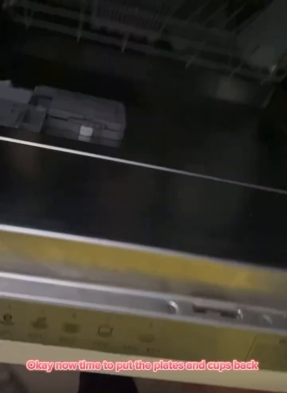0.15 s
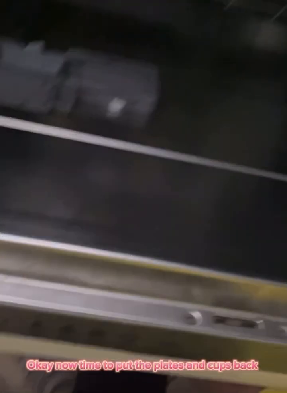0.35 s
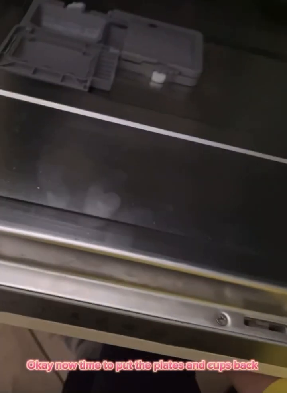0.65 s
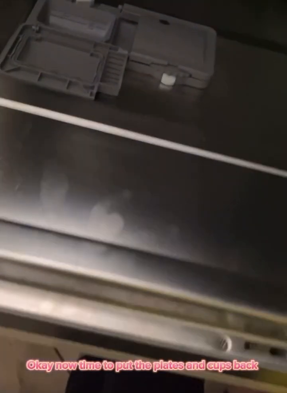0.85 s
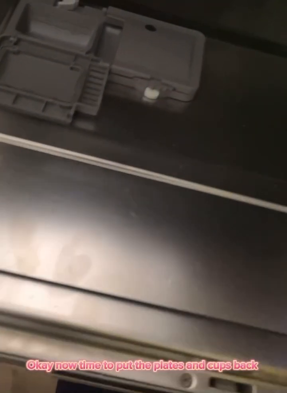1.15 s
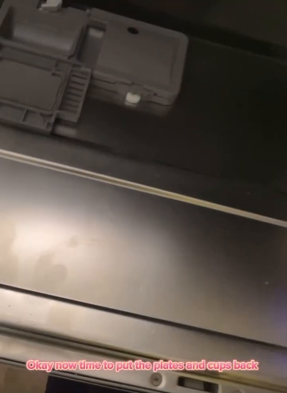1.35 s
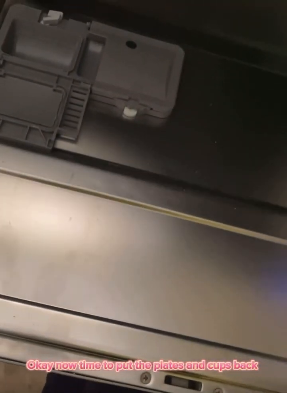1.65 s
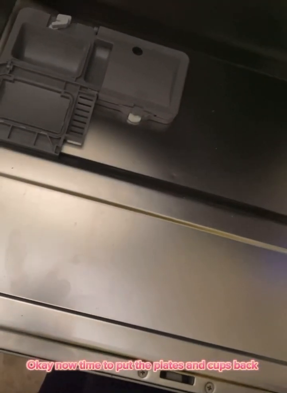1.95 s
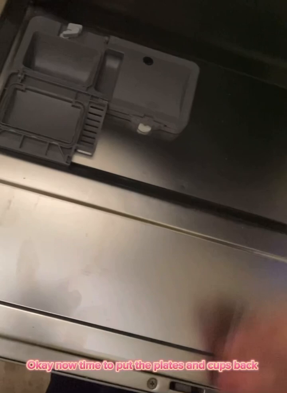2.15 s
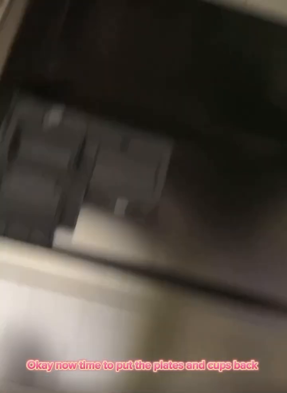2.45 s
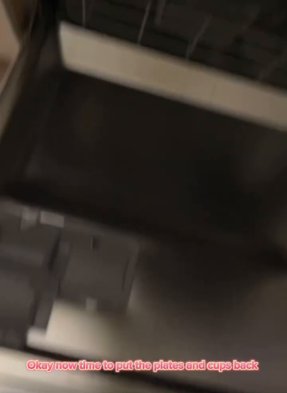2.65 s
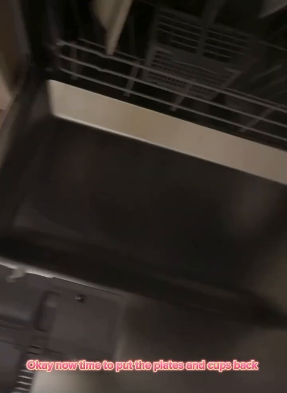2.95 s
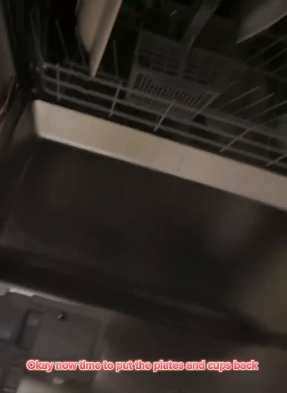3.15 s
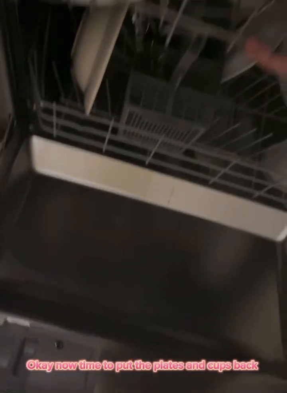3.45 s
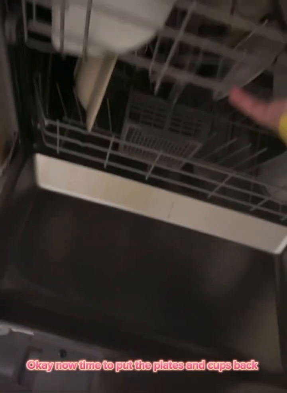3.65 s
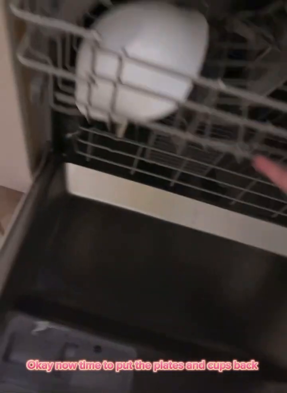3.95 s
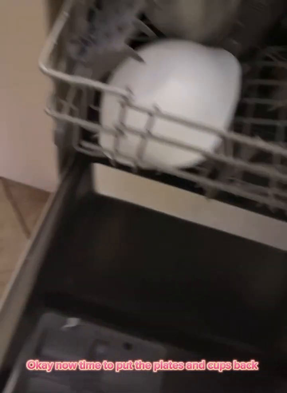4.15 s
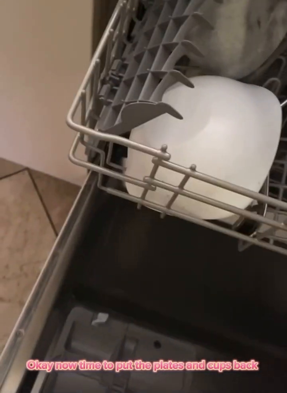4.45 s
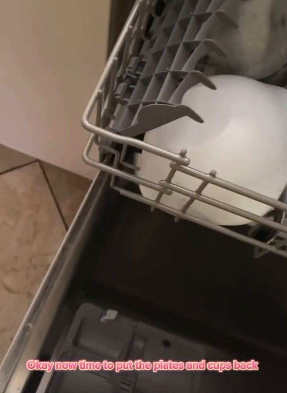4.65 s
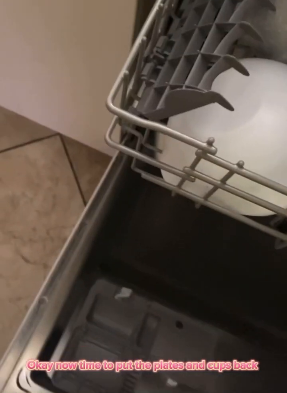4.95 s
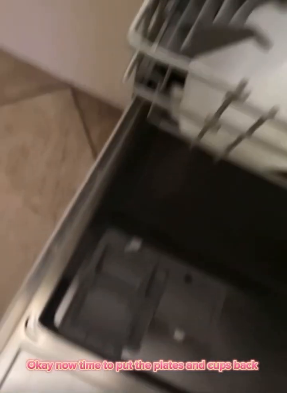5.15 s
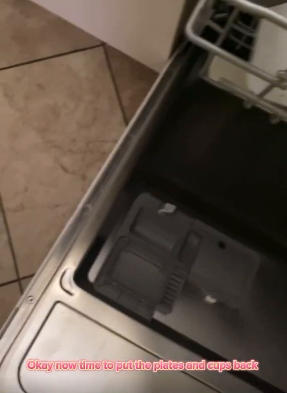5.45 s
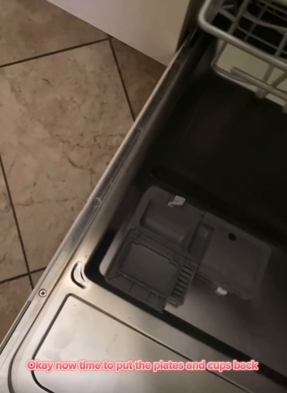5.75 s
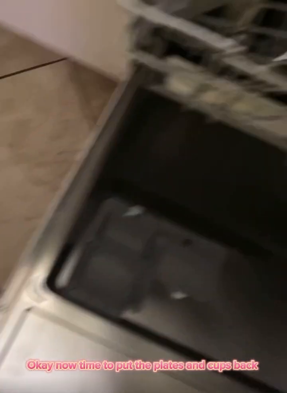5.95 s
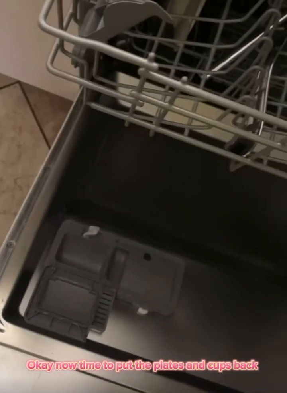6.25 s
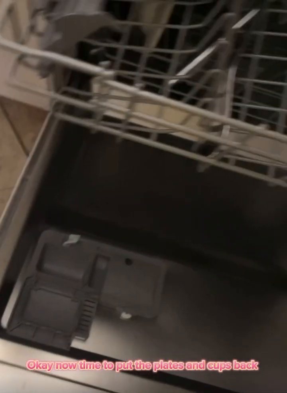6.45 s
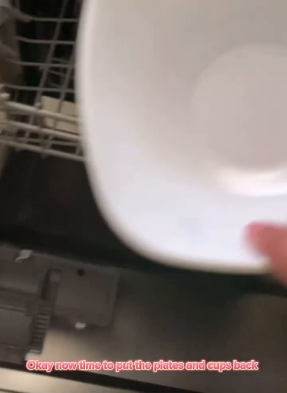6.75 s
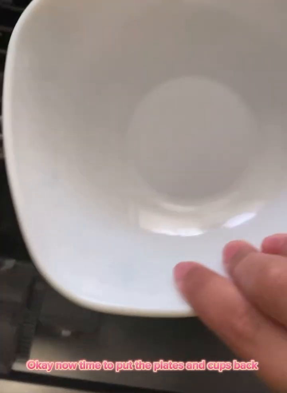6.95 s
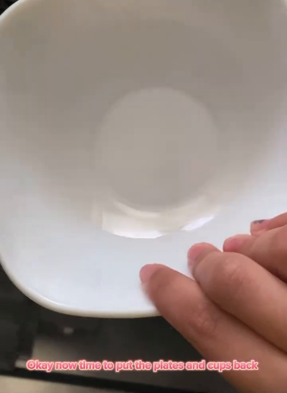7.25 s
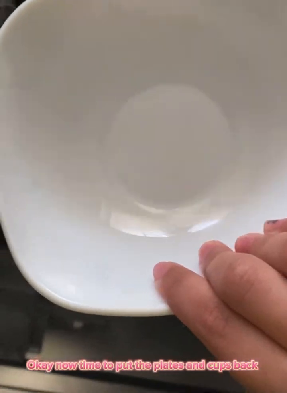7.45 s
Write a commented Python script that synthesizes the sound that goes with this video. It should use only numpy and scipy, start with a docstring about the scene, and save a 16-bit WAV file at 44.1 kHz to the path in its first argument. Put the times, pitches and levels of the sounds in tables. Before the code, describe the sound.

A quiet home kitchen with very faint room tone and hum, heard close up in stereo. Dull, roomy hammer-like thuds come from elsewhere in the house at about 0.3, 0.65, 1.0 and 1.4 s, with tiny nearby ticks and soft arm rustles around 0.9 and 2.4 s. Light taps come at 2.2 and 2.9 s. From 3.0 to 4.5 s a loaded dishwasher rack rolls out: low tub rumble, jiggling dishes, a light axle hiss and irregular knocks, strongest around 4.1 to 4.5 s. Small knocks follow near 4.7 s. From 5.15 to 5.9 s the rack is shaken as a bowl comes free, with knocks, small clinks, a quick rising metallic scrape at 5.5 s and bright ringing wire snaps at 5.7 to 5.8 s. Two more muffled thuds land at 6.1 and 6.4 s, their echoes fading; a barely audible brush at 6.9 s, then quiet.

```python
"""Unloading a dishwasher

Close by, the loaded upper rack rolls out on its rails: filtered noise rumbles, jiggles and hisses, bursts knock.
A bowl is lifted out: moving resonances scrape along the wires, which snap back and ring as decaying sines.
An arm rustles softly; dull blows, like hammering, come from elsewhere in the house over a quiet kitchen."""
import sys
import numpy as np
from scipy import signal
from scipy.fft import rfft, irfft
from scipy.io import wavfile
from scipy.ndimage import uniform_filter1d

SR = 44100
rng = np.random.default_rng(int(sys.argv[2]) if len(sys.argv) > 2 else 0)


def pcm_store(signal):
    """Save signal as 16-bit PCM."""
    levels = np.round(np.clip(np.atleast_2d(signal), -1, 1) * 32767)
    wavfile.write(sys.argv[1], SR, levels.astype(np.int16).T)


N = 335160
TIME = np.arange(N) / SR

# relative colour of the rumbling tub: [f/Hz, density/dB]
RUMBLE = [(20, -25.5), (45, -18), (70, -4), (92, 2.5), (125, -1.5), (170, -14), (260, -16.5), (600, -68.5)]
# relative colour of hissing axles, ticks and rubbed wire: [f/Hz, density/dB]
HISS = [(900, -22.5), (2400, 1.5), (3700, 2), (4900, -2.5), (5900, 3.5), (7300, -4), (8000, -3),
        (10000, -3), (11600, -1), (13500, -12)]
# phase by which the left microphone port leads the right: [f/Hz, phase/rad]
PORT_LEAD = [(100, 0), (620, -.55), (1300, 0), (2500, .6), (4200, 1.1), (5500, .4), (8600, 1.85),
             (12000, 3.0)]


def amp(db):
    """Decibels to a linear gain."""
    return 10 ** (np.asarray(db) / 20)


def evened(x):
    """Scales a signal to an RMS of one."""
    return x / np.sqrt(np.mean(x ** 2) + 1e-20)


def read(points, hz):
    """Reads a table along a logarithmic frequency axis."""
    f, value = np.transpose(points)
    return np.interp(np.log(hz + 1), np.log(f + 1), value)


def add(mix, s, sound):
    """Lays a sound into the mix at s seconds, cut at the end."""
    part = mix[:, round(s * SR):][:, :sound.shape[1]]
    part += sound[:, :part.shape[1]]


def drift(size, count):
    """Smooth chance that changes about once in count samples."""
    once = uniform_filter1d(rng.standard_normal(size), count)
    return evened(uniform_filter1d(once, count))


def noise(colour, size, grit=1):
    """Coloured noise at two microphone ports, more or less alike by frequency."""
    # left-right likeness: [f/Hz, likeness 0-1]
    likeness = [(150, 1), (300, 0.97), (520, 0.6), (1000, 0.5), (3000, 0.2), (6500, 0.2), (11000, 0.9)]
    hz = np.fft.rfftfreq(size, 1 / SR)
    left, other = rfft(rng.standard_normal((2, size)) * grit)
    same = np.clip(read(likeness, hz), 0, 1)
    right = same * left + np.sqrt(1 - same ** 2) * other
    right = right * np.exp(-1j * read(PORT_LEAD, hz))
    return evened(irfft(np.array([left, right]) * amp(read(colour, hz)), size))


def burst(colour, bands, size, window_s, swell, grit=1):
    """A blow on a body with dense modes: each band swells (by this power of time), dies fast, then lingers."""
    t, hz = np.arange(size) / SR, np.fft.rfftfreq(size, 1 / SR)
    spectrum, out = rfft(noise(colour, size, grit)), 0
    centres = np.array(bands)[:, 0]
    for own, (_, rise, t60, room_db, room_t60) in zip(np.eye(len(bands)), bands):
        share = read(np.c_[centres, own], hz)
        age = np.maximum(t - rise, 0)
        body, room = amp(-60 * age / t60), amp(room_db - 60 * age / room_t60)
        shape = np.minimum(t / rise, 1) ** swell * np.hypot(body, room)
        out = out + irfft(spectrum * share, size) * shape
    # the loudest short window is brought to an RMS of one
    loudest = uniform_filter1d((out ** 2).mean(0), int(window_s * SR) + 1).max()
    end_fade = np.minimum((t[-1] - t) / .1, 1)
    return out / np.sqrt(loudest) * end_fade


def resonate(x, hz, width):
    """A steep resonance that follows the curve hz: shift down, smooth with two equal poles, shift back up."""
    turn, r = np.exp(2j * np.pi * np.cumsum(hz) / SR), np.exp(-np.pi * width / SR)
    smoothed = signal.lfilter([(1 - r) ** 2], [1, -2 * r, r * r], x / turn)
    return (turn * smoothed).real


def envelope(start, stop, rise_s, fall_db_per_s):
    """Rises from the start, holds, and dies away after the stop."""
    rise = np.clip((TIME - start) / rise_s, 0, 1)
    return rise * amp(-fall_db_per_s * np.maximum(TIME - stop, 0))


def motion(level_db, push_db, fall_db_per_s):
    """Gain of one sound of the rack: each move gets going, surges once and dies away."""
    # the rack is pulled out, then shaken as the bowl comes free:
    # [start t/s, stop t/s, relative level/dB, hardest push t/s, width of the push/s]
    moves = [(2.985, 4.45, -2, 4.03, 0.49), (5.146, 5.884, -5.5, 5.82, 0.11)]
    gain = 0
    for start, stop, db, hardest, width in moves:
        push = np.exp(-((TIME - hardest) / width) ** 2)
        course = envelope(start, stop, rise_s=0.2, fall_db_per_s=fall_db_per_s)
        gain = gain + amp(level_db + db + push_db * push) * course
    return gain


def rolling():
    """Wheels run over the rails in lumps: the tub rumbles, dishes jiggle and shift by turns, the axles hiss."""
    # modes of the loaded rack in the tub: [f/Hz, width/Hz, relative level/dB]
    load_modes = [(200, 70, 1.5), (298.4, 39, 8.5), (428, 48, 3), (498.7, 40, 0.5), (623, 200, -5),
                  (870, 90, -10)]
    # relative colour of the jolts: [f/Hz, density/dB]
    jolt_colour = [(150, -12), (300, 1), (900, -6), (1300, -12), (1900, -19), (5000, -33)]
    bumps_per_s, bump_decay_s, floor_between = 24, .012, .25  # decay to 1/e; the floor is a gain
    rumble = motion(level_db=-51.5, push_db=12, fall_db_per_s=40) * noise(RUMBLE, N)

    bumps = (rng.random(N) < bumps_per_s / SR) * rng.uniform(.5, 1, N)
    shaking = signal.lfilter([1], [1, -np.exp(-1 / (bump_decay_s * SR))], bumps)
    jolts = noise(jolt_colour, N, floor_between + np.minimum(shaking, 1))
    load = 0
    for hz, width, db in load_modes:
        # each mode wanders in strength and pitch as the dishes shift
        loose_db, seated = 4 * drift(N, count=1500), 1 + .035 * drift(N, count=4000)
        load = load + amp(db + loose_db) * evened(resonate(jolts, hz * seated, width))
    rattle = motion(level_db=-52.5, push_db=11.3, fall_db_per_s=83) * (evened(load) + amp(-4.0) * jolts)

    pressure_db = 1.5 * drift(N, count=500) + 2.6 * drift(N, count=30)
    hiss = motion(level_db=-60.5, push_db=4.9, fall_db_per_s=200) * noise(HISS, N, amp(pressure_db))
    return rumble + rattle + hiss


def knocks():
    """Each jolt rings one part; a soft one sets in gently and thuds in the tub, a hard one ticks at the rail."""
    # knocks of rack and dishes: [t/s, level/dB, hardness of the contact/dB, pitch of the part f/Hz]
    knock_list = [(0.052, -62, 5.5, 1860), (0.146, -58.5, 0.5, 870), (0.917, -54, 0, 975),
                  (2.135, -70, -26, 342), (2.217, -57.5, 1.5, 392), (2.894, -59, -15, 420),
                  (2.999, -51.5, 14.5, 460), (3.023, -38, -1.5, 623), (3.048, -44, 16, 436),
                  (3.142, -50, -16, 428), (3.213, -49.5, -9, 435), (3.249, -42, -8, 890),
                  (3.377, -43.5, -8, 710), (3.654, -43, -22.5, 428), (3.702, -35.5, -10.5, 352),
                  (3.857, -42.5, 0.5, 398), (3.964, -43.5, -8, 465), (4.099, -38, -2, 1330),
                  (4.125, -32, -0.5, 700), (4.141, -39, 15.5, 870), (4.195, -31, -3, 323),
                  (4.33, -45.5, -17, 470), (4.469, -35, 14, 1085), (4.481, -30.5, -1.5, 485),
                  (4.687, -55.5, -17, 400), (4.762, -49.5, -6, 900), (4.777, -49, -9.5, 980),
                  (5.151, -43.5, -7.5, 905), (5.285, -44.5, 0, 850), (5.319, -40.5, 0, 980),
                  (5.362, -35.5, 0.5, 1007), (5.393, -45, -8, 617), (5.516, -38.5, 6, 1070),
                  (5.735, -35.5, 1.5, 380), (5.757, -36, -5.5, 270), (5.812, -30, 14, 900),
                  (5.846, -37.5, -11, 291)]
    # relative colour under every ringing part: [f/Hz, density/dB]
    knock_colour = [(120, -27.5), (200, 0), (310, 2), (440, 2.5), (580, -3), (760, -2), (900, -5),
                    (1250, -8.5), (1800, -15), (2500, -21.5), (6000, -52)]
    # build-up and decay of a knock in the tub: [f/Hz, rise/s, body t60/s, room level/dB, room t60/s]
    tub_bands = [(78, 0.0077, 0.51, -13.5, 0.2), (350, 0.0018, 0.22, -9.5, 0.47),
                 (1200, 0.0092, 0.061, -7, 0.38), (7025, 0.0076, 0.15, -3, 0.29)]
    # thud and tick stand beside the knock at middling hardness (0 dB), as does the onset time
    thud_db, tick_db, thud_loss, onset_s = -5, -15.5, 0.8, 0.0038  # thud_loss: dB per dB of hardness
    peak_at_500_hz_db, peak_growth = 11.5, 0.18  # smaller, higher parts ring clearer by this power
    out, size, grid = np.zeros((2, N)), 16384, np.geomspace(60, 12000, 200)
    t = np.arange(size) / SR
    for s, db, hard_db, hz in knock_list:
        bump = np.exp(-(np.log(grid / hz) / .09) ** 2)
        peak_db = peak_at_500_hz_db * (hz / 500) ** peak_growth
        part = np.c_[grid, read(knock_colour, grid) + peak_db * bump]
        contact = np.minimum(t / (onset_s * amp(-hard_db / 2)), 1)
        layers = ((part, 0), (RUMBLE, thud_db - thud_loss * hard_db), (HISS, tick_db + hard_db))
        for colour, share_db in layers:
            blow = burst(colour, tub_bands, size=size, window_s=0.008, swell=.18)
            add(out, s, amp(db + share_db) * contact * blow)
    return out


def dense_modes(x, ripple_db):
    """The many close modes of a struck or rubbed body put fixed, uneven peaks on the treble."""
    hz = np.fft.rfftfreq(N, 1 / SR)
    ripple = amp(ripple_db * np.clip(hz / 1500, 0, 1) * drift(len(hz), count=400))
    return irfft(rfft(x) * ripple, N)


def wire_ring(size):
    """Modes of the rack: shares vary with the place struck; wires touch their neighbours and flutter."""
    # modes of the wire rack: [f/Hz, relative level/dB, t60/s]
    wire_modes = [(870, -7.5, .3), (920, -7, 0.19), (2020, -0.5, 0.25), (2450, -4, .16), (2573, -6, .16),
                  (3441, -8, .2), (3500, -1.5, .2), (5360, 1, 0.15), (5317, -4.5, 0.23), (6382, -7, .2),
                  (7531, -6.5, 0.23), (9600, -13.5, .25), (11100, -10, 0.17), (12190, -14.5, .28)]
    flutter_db = 5.5
    t = np.arange(size) / SR
    hz, db, t60 = np.transpose(wire_modes)[:, :, None]
    turn, place, offset = rng.standard_normal((3, len(wire_modes), 1))
    flutter, slip = np.array([[drift(size, count=300) for _ in wire_modes] for _ in range(2)])
    phase = 2 * np.pi * (hz * t + turn) + .75 * slip
    ports = np.array([np.sin(phase), np.sin(phase - read(PORT_LEAD, hz) + 0.86 * offset)])
    level_db = db + 1.8 * place + flutter_db * flutter - 60 * t / t60
    return (amp(level_db) * ports).sum(1) / np.linalg.norm(amp(db))


def clinks():
    """A wire slips off a rim: a sharp snap, then the rack rings on, the more so after a hard snap."""
    # wires snapping against the dishes: [t/s, level/dB]
    snap_list = [(5.287, -43.5), (5.322, -40), (5.358, -37), (5.503, -45), (5.693, -26.5), (5.733, -22),
                 (5.753, -31), (5.8082, -18)]
    # relative colour of a snap: [f/Hz, density/dB]
    snap_colour = [(500, -9), (900, -4), (1700, -4.5), (2100, 6), (2700, 11.5), (3100, -10), (3550, 13.5),
                   (4600, -16), (5220, 1.5), (6500, -12), (7400, -6), (8400, -16), (11000, -4),
                   (12400, -11), (13500, -24)]
    # build-up and decay of a snap: [f/Hz, rise/s, body t60/s, room level/dB, room t60/s]
    snap_bands = [(700, 0.0009, 0.45, -9.5, 0.49), (2700, 0.00047, 0.02, -15, 0.36),
                  (5500, .0007, 0.048, -11, 0.38), (12000, .0006, 0.094, -13, 0.2)]
    full_ring_db, ring_growth = 2, 1.72  # ring of a full-scale snap; dB of ring per dB of snap
    out = np.zeros((2, N))
    for s, db in snap_list:
        add(out, s, amp(db) * burst(snap_colour, snap_bands, size=32768, window_s=0.00083, swell=.18))
        add(out, s, amp(full_ring_db + ring_growth * db) * wire_ring(size=32768))
    return out


def scrape():
    """Stick and slip drive a wire: it grows louder, its pitch falls unevenly toward the tip, then it rings free."""
    # dishes sliding along a wire: [start t/s, length/s, level at the end/dB, share of the way to the tip 0-1]
    slides = [(4.362, 0.05, -48.5, 0.4), (4.7, 0.028, -63, 0.34), (5.23, 0.012, -63, 0.5),
              (5.454, 0.084, -42.5, 0.3), (5.532, 0.067, -30, 1)]
    # resonances of the free wire: [f/Hz, width/Hz, relative level/dB]
    rubbed_modes = [(2150, 430, -2), (3596, 480, 2.5), (5254, 370, 7), (7000, 500, -2.5), (9500, 1100, -8),
                    (11400, 1100, -9.5)]
    shortened_hz, slip_power = 680, 2.4  # the held wire rings this much higher; the slide speeds up to the tip
    press_power, let_go_db_per_s = 1.03, 451  # pressure builds along the slide, then drops
    freed_db = 0.5  # ring of the wire as the dish leaves it, beside the slide, at the tip
    out, size = np.zeros((2, N)), 32768
    t = np.arange(size) / SR
    for start, length, end_db, way in slides:
        done = np.minimum(t / length, 1)
        rub = noise(HISS, size, amp(3.5 * drift(size, count=35)))
        shift_hz = shortened_hz * (1 - way * done ** slip_power)
        wire = 0
        for hz, width, db in rubbed_modes:
            wander, catch_db = .2 * shift_hz * drift(size, count=150), 2.5 * drift(size, count=300)
            wire = wire + amp(db + catch_db) * evened(resonate(rub, hz + shift_hz + wander, width))
        pressure = done ** press_power * amp(-let_go_db_per_s * np.maximum(t - length, 0))
        add(out, start, amp(end_db) * pressure * evened(evened(wire) + amp(-8) * rub))
        freeing = 1 - amp(-let_go_db_per_s * t)
        add(out, start + way * length, way * amp(end_db + freed_db) * freeing * wire_ring(size=size))
    return out


def rustles():
    """The reaching arm brushes softly: noise that sets in quickly and slackens as the arm slows."""
    # strokes of the arm: [start t/s, length/s, level/dB]
    strokes = [(0.87, 0.34, -63.5), (2.375, 0.58, -64), (6.938, 0.019, -67.5)]
    # relative colour of the rustle: [f/Hz, density/dB]
    brush_colour = [(880, -12), (1600, -8.5), (5000, -9.5), (12400, -1.5)]
    sag_db_per_s = 22
    gain = 0
    for start, length, db in strokes:
        sag_db = sag_db_per_s * np.maximum(TIME - start, 0)
        gain = gain + amp(db - sag_db) * envelope(start, start + length, rise_s=0.037, fall_db_per_s=172)
    return gain * noise(brush_colour, N)


def wall_ring(spot, size):
    """The low wall modes that a blow on this spot wakes: deeper ones swell later, higher ones ring longer."""
    # modes of the wall: [spot struck, f/Hz, level beside the blow/dB]
    wall_modes = [(1, 80.4, -3.5), (1, 170, -11.5), (1, 263, -9.5), (1, 337, -10.5), (1, 403, -5),
                  (1, 489, -6), (1, 510, -7), (2, 86, -9), (2, 243, -6.5), (2, 390, -1.5)]
    rise_at_100_hz, t60_at_100_hz = 0.041, 0.24  # s
    t, out = np.arange(size) / SR, np.zeros((2, size))
    for where, hz, db in wall_modes:
        if round(where) == spot:
            rise = rise_at_100_hz * np.sqrt(100 / hz)
            t60 = t60_at_100_hz * (hz / 100) ** .25
            decay = amp(db - 60 * np.maximum(t - rise, 0) / t60)
            shape = np.minimum(t / rise, 1) ** 2 * decay
            phase = 2 * np.pi * (hz * t + rng.random())
            out += shape * np.array([np.sin(phase), np.sin(phase - read(PORT_LEAD, hz))])
    return out


def hammering():
    """Blows on one spot thud and ring alike, with clumped echoes; loose panels clatter anew each time."""
    # far blows: [t/s, level before the final mix/dB, spot struck]
    blow_list = [(0.287, -37.5, 0), (0.644, -33.5, 1), (.993, -31, 1), (1.379, -32.5, 1), (6.072, -31, 2),
                 (6.414, -30.5, 2)]
    # relative colour of a blow, one table for each spot: [f/Hz, density/dB]
    spot_colours = [
        [(25, -23), (85, -1.5), (150, -8), (330, -6), (460, -17), (750, -6), (1050, -17), (1600, -25.5),
         (3000, -26.5), (5500, -35), (12000, -68)],
        [(25, -51), (50, -14), (95, -2), (150, -8.5), (300, -6.5), (520, -4.5), (700, -14.5), (1200, -22),
         (1800, -30), (2650, -24), (3400, -33), (4200, -30.5), (5800, -35.5), (12000, -65)],
        [(25, -40.5), (50, -4), (130, -6), (210, 0), (370, -1), (550, -6.5), (750, -12), (1300, -21),
         (2900, -22), (5000, -35), (6500, -54.5), (12000, -73)],
    ]
    # build-up and decay of a far blow: [f/Hz, rise/s, body t60/s, room level/dB, room t60/s]
    far_bands = [(76, 0.075, 0.37, -10.5, 1.33), (198, 0.041, 0.25, -7.5, 0.99),
                 (473, 0.015, 0.37, -16, 1.46), (1090, 0.0063, 0.33, -17, 1.48),
                 (3250, 0.015, 0.32, -8.5, 1.3), (7990, 0.018, 0.33, -5, 0.98)]
    # loose panels: [spot struck, f/Hz, width/Hz, level beside the blow/dB]
    loose_panels = [(0, 970, 350, -9), (1, 1155, 263, -18.5), (1, 2704, 336, -11), (1, 3860, 480, -16),
                    (1, 5760, 330, -22.5), (2, 1400, 260, -16.5), (2, 2900, 755, -19.5)]
    # build-up and decay of a clatter: [f/Hz, rise/s, body t60/s, room level/dB, room t60/s]
    clatter_bands = [(3000, 0.027, 0.26, -13, 1)]
    size, grid = 65536, np.geomspace(60, 12000, 400)
    paths = []
    for spot, colour in enumerate(spot_colours):
        clumps = amp(1.2 * drift(size, count=200))
        thud = burst(colour, far_bands, size=size, window_s=0.008, swell=.8, grit=clumps)
        paths.append(thud + wall_ring(spot, size))
    out = np.zeros((2, N))
    for s, blow_db, spot in blow_list:
        add(out, s, amp(blow_db) * paths[round(spot)])
        for where, hz, width, db in loose_panels:
            if round(where) == round(spot):
                panel = np.c_[grid, -20 * np.log10(1 + (2 * (grid - hz) / width) ** 2)]
                uneven = amp(-1 * drift(size, count=200))
                clatter = burst(panel, clatter_bands, size=size, window_s=0.003, swell=.8, grit=uneven)
                add(out, s, amp(blow_db + db) * clatter)
    return out


def kitchen():
    """The quiet of the room: coloured noise, with a faint wavering hum and whine from narrow resonances."""
    # relative colour of the quiet: [f/Hz, density/dB]
    air_colour = [(15, -50.5), (25, -1.5), (108, -14), (214, -11.5), (250, -9.5), (278, -17), (456, -18),
                  (812, -32), (3160, -38), (3420, -40), (13000, -42)]
    # faint tones: [f/Hz, level/dB]
    tones = [(243, -79.5), (3420, -94)]
    air = noise(air_colour, N)
    hum = sum(amp(db) * evened(resonate(air, np.full(N, hz), width=33)) for hz, db in tones)
    return amp(-70) * air + hum


def scene():
    """All sources over the quiet of the kitchen; the far blows are slightly louder at the left port."""
    rack = dense_modes(rolling() + knocks(), ripple_db=2.9) + clinks() + scrape()
    return hammering() * amp([[.6], [-.6]]) + rack + rustles() + kitchen()


def record(dry):
    """The bass roll-off of the microphone and the band limit of the recorder."""
    edge_hz = 13000
    thinned = signal.sosfilt(signal.butter(2, 42, "high", fs=SR, output="sos"), dry)
    band_limit = signal.firwin(255, edge_hz, window=("kaiser", 9), fs=SR)
    return signal.oaconvolve(thinned, band_limit[None], "same")


dry = scene()
out = record(dry)
pcm_store(out)
```